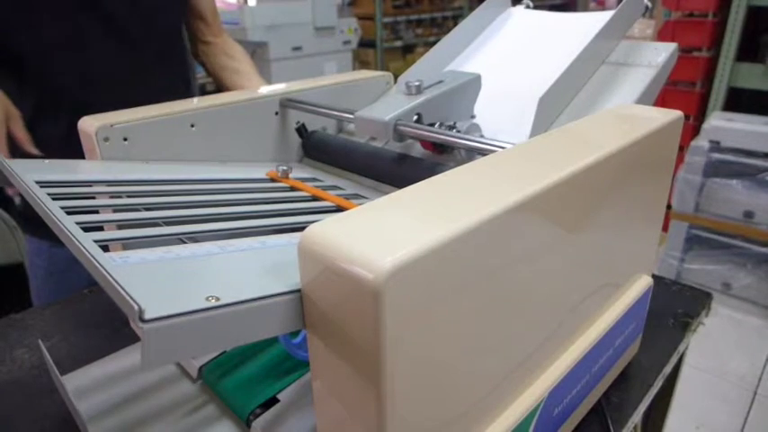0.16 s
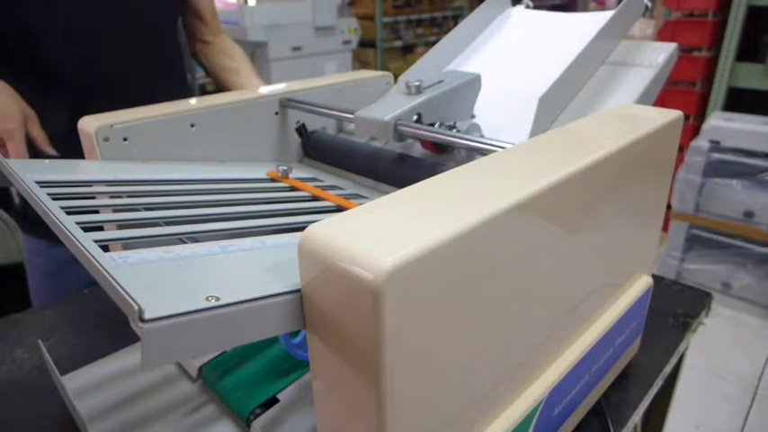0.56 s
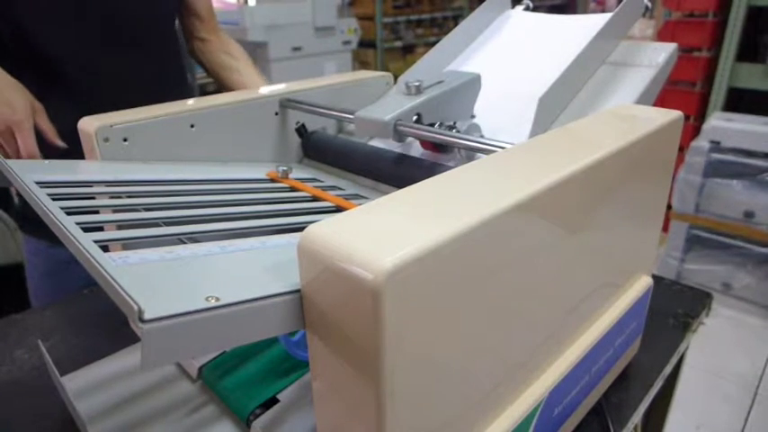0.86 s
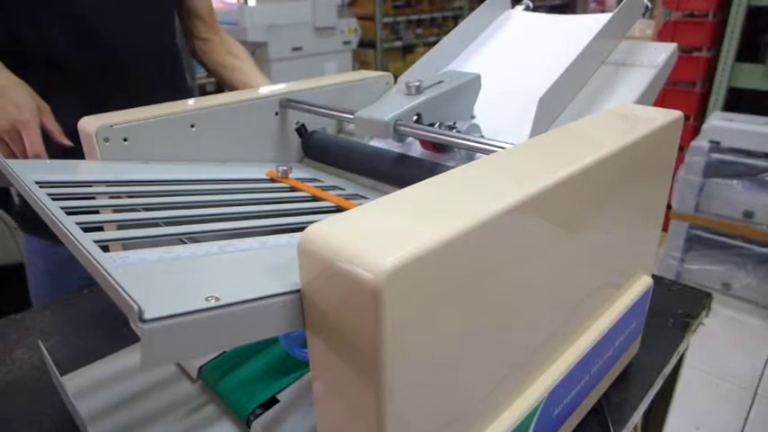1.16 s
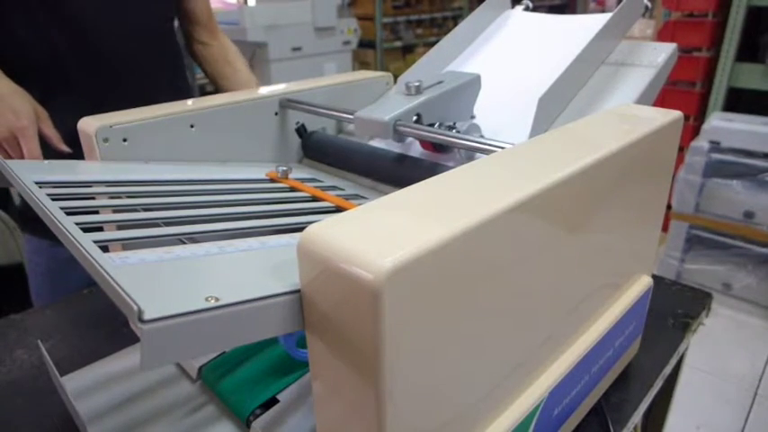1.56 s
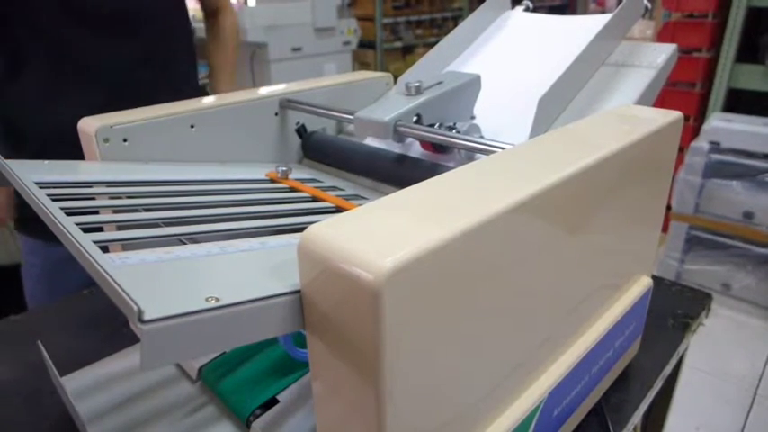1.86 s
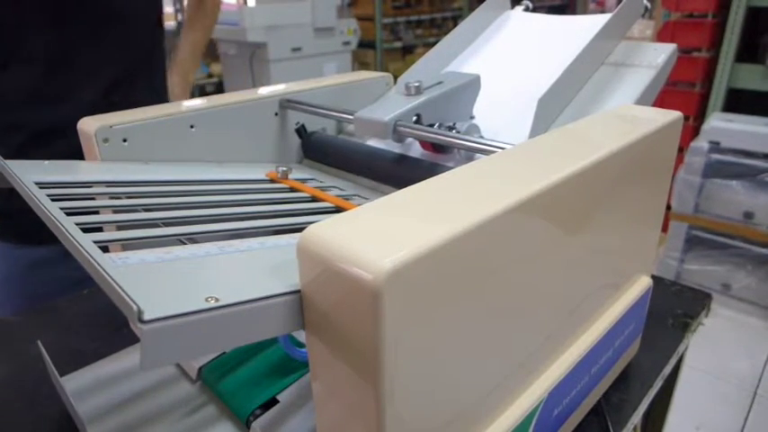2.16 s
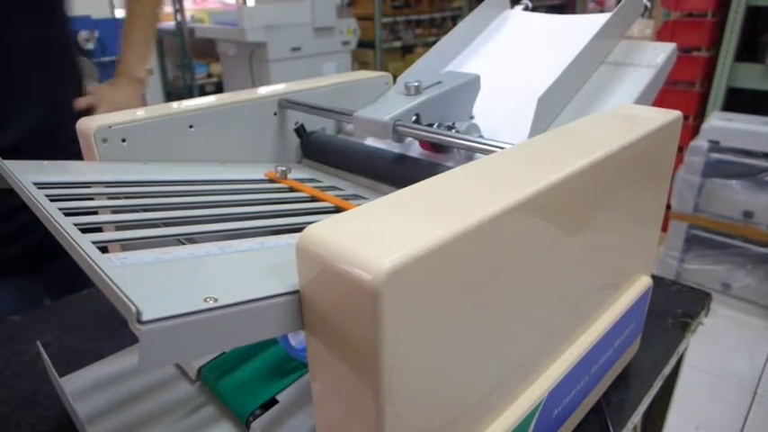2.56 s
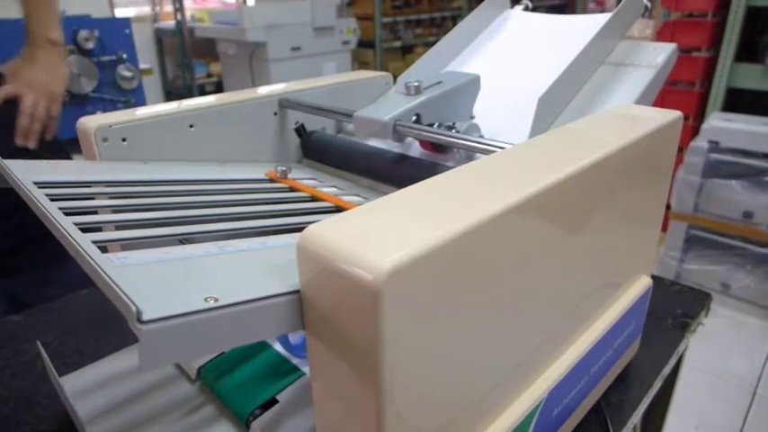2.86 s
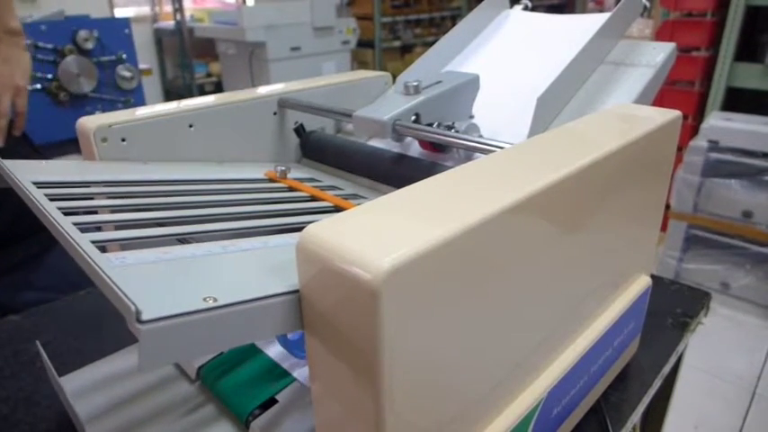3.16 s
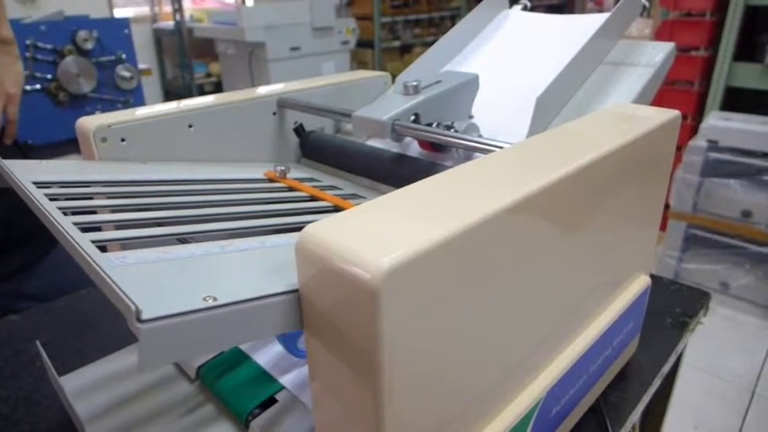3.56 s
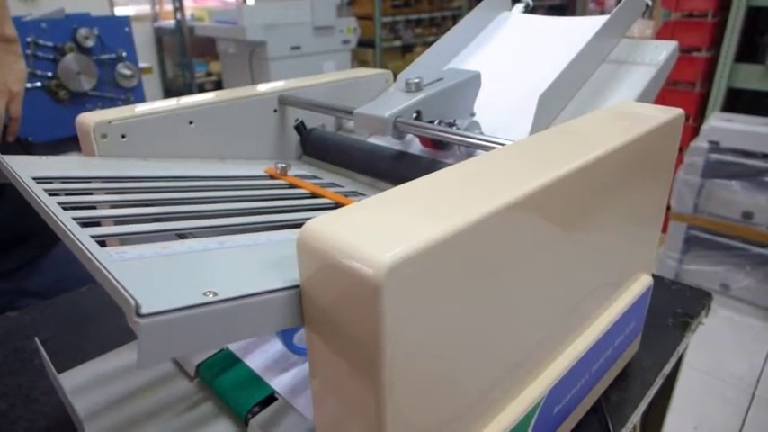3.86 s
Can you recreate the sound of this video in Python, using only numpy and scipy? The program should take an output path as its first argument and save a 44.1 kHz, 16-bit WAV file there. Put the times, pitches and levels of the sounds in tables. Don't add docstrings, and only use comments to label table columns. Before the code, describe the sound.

A paper folding machine heard close in a workshop. Until 0.6 s there is only a low distant fan murmur, a fading faint clang and a tiny tick. A switch snaps with a short metallic ring; a low motor hum spins up, with paper rustle and flaps. From 1.05 s, eight sheets pass about every 0.38 s: bright hard slap, weaker slap 0.12 s later, hiss and ticks, continuing to the cut-off at 4 s.

```python
import sys
import numpy as np
from scipy import signal
from scipy.fft import rfft, irfft
from scipy.io import wavfile
from scipy.ndimage import uniform_filter1d

SR = 44100
rng = np.random.default_rng(int(sys.argv[2]) if len(sys.argv) > 2 else 0)


def gain_from_db(level_db):
    decades = np.asarray(level_db, float) / 20
    return 10 ** decades


def store_wav(level_fs):
    pcm = np.round(np.clip(np.atleast_2d(level_fs), -1, 1) * 32767)
    wavfile.write(sys.argv[1], SR, pcm.T.astype(np.int16))


N = 176400

SWITCH_S = 0.607

# start in seconds, level in dB, pitch in Hz.
FIRST_STOP = [
    (1.052, -9.5, 2430),
    (1.4431, -7.5, 2830),
    (1.8191, -9.5, 2740),
    (2.1895, -10, 2400),
    (2.563, -8, 2510),
    (2.9414, -9, 2600),
    (3.317, -9.5, 2380),
    (3.697, -6.5, 2060),
]
# frequency in Hz, level in dB.
SECOND_BODY = [(120, -37), (200, 1), (1590, 1.5), (2090, -14.5), (3180, -3.5), (4750, -9), (7220, -18),
               (11400, -22), (15500, -45)]
# frequency in Hz, level in dB.
RUMBLE = [(300, -19), (500, -3), (800, -0.5), (1300, -7), (2200, -11), (4000, -48)]
# frequency in Hz, likeness from 0 to 1.
SAME = [(60, 0.27), (180, 0.99), (550, 0.98), (1650, 0.84), (4970, 0.81), (15000, 0.64)]


def evened(x):
    return x / np.sqrt(np.mean(x ** 2) + 1e-20)


def read(points, hz):
    f, value = np.transpose(points)
    return np.interp(np.log(hz + 1), np.log(f + 1), value)


def curve(points, t):
    return np.interp(t, *np.transpose(points))


def add(mix, s, sound):
    part = mix[:, round(s * SR):][:, :sound.shape[1]]
    part += sound[:, :part.shape[1]]


def resonate(x, hz, width):
    turn = np.exp(2j * np.pi * hz * np.arange(x.shape[-1]) / SR)
    r = np.exp(-np.pi * width / SR)
    return 2 * (turn * signal.lfilter([1 - r], [1, -r], x / turn)).real


def colour(x, body, same):
    hz = np.fft.rfftfreq(x.shape[1], 1 / SR)
    likeness = np.clip(read(same, hz), 0, 1)
    a, b = rfft(x, axis=1)
    mid = np.sqrt((1 + likeness) / 2) * a
    side = np.sqrt((1 - likeness) / 2) * b
    pair = np.array([mid + side, mid - side]) * gain_from_db(read(body, hz))
    return evened(irfft(pair, x.shape[1], axis=1))


def grainy(grain_db, grain_s):
    flicker = evened(uniform_filter1d(rng.standard_normal(N), max(round(grain_s * SR), 2)))
    return rng.standard_normal((2, N)) * gain_from_db(grain_db * flicker)


def knock(db, hz, body, t60, ring_db, width, rise):
    t = np.arange(4096) / SR
    noise = colour(rng.standard_normal((2, len(t))), body, SAME)
    noise = noise + gain_from_db(ring_db) * evened(resonate(noise, hz, width))
    burst = gain_from_db(-60 * (t / t60) ** 1.64) * np.minimum(t / rise, 1) * noise
    burst = signal.sosfilt(signal.butter(2, 350, "high", fs=SR, output="sos"), burst)
    return gain_from_db(db) * burst / abs(burst).max()


def since_stop(t):
    starts = np.array([0.643] + [row[0] for row in FIRST_STOP])
    return t - starts[np.maximum(np.searchsorted(starts, t) - 1, 0)]


def shop():
    # frequency in Hz, level in dB.
    shop_body = [(15, -51), (25, -40), (64, -39), (101, -14), (136, -7.5), (684, -4.5), (3260, -23.5),
                 (6920, -25), (15500, -41.5)]
    # frequency in Hz, likeness from 0 to 1.
    shop_same = [(60, 0.98), (380, 0.98), (2380, 0.71), (15000, 0.5)]
    # frequency in Hz, width in Hz, level in dB.
    shop_lines = [(4021, 60, -80), (4850, 80, -80), (6804, 10, -70)]
    t = np.arange(N) / SR
    floor = gain_from_db(-48) * colour(grainy(grain_db=2.56, grain_s=0.036), shop_body, shop_same)
    clang_hz, clang_db, clang_t60 = 1110, -50, 0.61
    clang = gain_from_db(clang_db - 60 * t / clang_t60) * np.sin(2 * np.pi * clang_hz * t)
    white = rng.standard_normal((2, N))
    whines = sum(gain_from_db(db) * evened(resonate(white, hz, w)) for hz, w, db in shop_lines)
    return floor + clang + whines


def motor():
    # time in seconds, level in dB.
    load = [(0.62, -48), (0.66, -39.5), (0.88, -33.5), (0.9, -45), (0.95, -27.5), (1.06, -40.5),
            (1.76, -31.5), (1.79, -39.5), (2.52, -34.5), (2.58, -48), (2.84, -31), (2.91, -46), (2.93, -37),
            (3.2, -40.5), (3.25, -30.5), (3.3, -46.5), (3.52, -39), (4.0, -38.5)]
    # seconds after the first stop, level in dB.
    grip = [(0, 4), (.02, -5), (.11, 1), (.14, 3.5), (.3, 0.5), (.34, 0), (.38, 7)]
    # frequency in Hz, width in Hz, level in dB.
    case_modes = [(192.4, 10.3, -11.5), (266.6, 23.4, 0.5), (330.3, 8.8, -5.5), (407, 11.8, -10),
                  (429, 14.4, -10)]
    # frequency in Hz, level in dB.
    whirr_body = [(15, -54), (25, -51), (55, -51), (175, -27), (260, -4.5), (482, -24), (848, -18),
                  (11200, -41.5), (15500, -55)]
    mesh_hz, teeth, spin_up_s, spin_from = 266, 10, .25, .88
    t = np.arange(N) / SR
    on = np.clip((t - SWITCH_S) / 0.037, 0, 1)
    speed = 1 - (1 - spin_from) * np.exp(-np.maximum(t - SWITCH_S, 0) / spin_up_s)
    wobble = evened(uniform_filter1d(uniform_filter1d(rng.standard_normal(N), 900), 900))
    turns = np.cumsum(mesh_hz * speed * (1 + 0.0284 * wobble)) / SR
    throb = 1 + .2 * np.cos(2 * np.pi * turns / teeth)
    rattle = rng.standard_normal(N)
    case = sum(gain_from_db(db) * evened(resonate(resonate(rattle, hz, w), hz, 3 * w)) for hz, w, db in case_modes)
    hum = evened(evened(case) + gain_from_db(-1) * np.sin(2 * np.pi * turns))
    hum_db = curve(load, t) + curve(grip, since_stop(t)) * (t > FIRST_STOP[0][0])
    whirr = gain_from_db(-41.5) * colour(grainy(grain_db=1.5, grain_s=.004), whirr_body, SAME)
    return on * (throb * hum * gain_from_db(hum_db) + whirr)


def crackle():
    snaps_per_s = 800
    size = gain_from_db(3.6 * np.minimum(rng.exponential(1, N), 4)) * (rng.random(N) < snaps_per_s / SR)
    fading = signal.lfilter([1], [1, -.96], size)
    return evened(fading * rng.standard_normal((2, N)))


def patchy(x, patch_db):
    z = signal.stft(x, nperseg=256)[2]
    field = rng.standard_normal(z.shape[1:])
    field = uniform_filter1d(uniform_filter1d(field, size=9, axis=0), size=7, axis=1)
    return evened(signal.istft(z * gain_from_db(patch_db * evened(field)), nperseg=256)[1][:, :N])


def paper():
    # seconds after the first stop, level in dB.
    slide = [(0, 3), (.05, -8), (.11, -17), (.118, 6.5), (.16, 2.5), (.2, -1), (.23, 3.5), (.3, 3),
             (.38, -20.5)]
    # seconds after the first stop, level in dB.
    scrape_db = [(0, 8.5), (.11, 4.5), (.125, 8), (.2, 5), (.23, 7), (.27, 2.5), (.31, 9.5), (.38, 4.5)]
    # time in seconds, level in dB.
    feed_in = [(.62, -9), (.8, -27), (.83, -11), (.93, -20), (.95, -1.5), (1.04, -4.5)]
    # frequency in Hz, level in dB.
    hiss_body = [(530, -25), (900, -6), (1580, -3.5), (2220, -1.5), (4080, 0), (4440, -3.5), (4770, 0.5),
                 (10800, -8), (15500, -21)]
    # frequency in Hz, width in Hz, level in dB.
    plates = [(2580, 120, -24.5), (4100, 74, -16.5), (5200, 550, -20), (7840, 310, -23.5)]
    t = np.arange(N) / SR
    since = since_stop(t)
    feed_db = curve(feed_in, t) - 60 * (t < SWITCH_S)
    rumble = colour(grainy(grain_db=2.0, grain_s=.006), RUMBLE, SAME)
    rumble = rumble * gain_from_db(-43.5 + curve(slide, since) + 0.31 * feed_db)
    fibres = grainy(grain_db=0.5, grain_s=.006) + gain_from_db(-7) * crackle()
    scrape = patchy(colour(fibres, hiss_body, SAME), patch_db=2.5)
    ringing = sum(gain_from_db(db) * evened(resonate(scrape, hz, w)) for hz, w, db in plates)
    hiss = (scrape + ringing) * gain_from_db(-43 + curve(scrape_db, since) + feed_db)
    return rumble + hiss


def switch():
    # frequency in Hz, level in dB.
    switch_body = [(120, -34), (200, 5), (497, -37), (1010, -5), (3360, -8.5), (4100, 0.5), (4840, -13),
                   (9310, -16), (15500, -29)]
    # frequency in Hz, level in dB, 60 dB decay in seconds.
    switch_ring = [(1100, 2, 0.14), (2306, -1, 0.083), (4040, -4, 0.16), (4300, -14, .07)]
    out = np.zeros((2, N))
    t = np.arange(8192) / SR
    add(out, SWITCH_S, knock(-18.5, 2200, switch_body, t60=.06, ring_db=-8, width=200, rise=0.00069))
    ring = sum(gain_from_db(db - 60 * t / t60) * np.sin(2 * np.pi * hz * t) for hz, db, t60 in switch_ring)
    add(out, SWITCH_S + .002, gain_from_db(-29.5) * np.array([ring, ring]) / abs(ring).max())
    return out


def air_puffs():
    # start in seconds, level in dB.
    puffs = [
        (.95, -52),
        (1.045, -57),
        (1.44, -57),
        (1.74, -55),
        (1.82, -59),
        (2.11, -53.5),
        (2.18, -54),
        (2.56, -53),
        (3.69, -56),
        (3.975, -47),
    ]
    out = np.zeros((2, N))
    puff_hz = 45
    t = np.arange(round(1.5 * SR / puff_hz)) / SR * puff_hz / 1.28
    for s, db in puffs:
        push = np.sin(3 * np.pi * t) * np.sin(np.pi * t) ** 2
        add(out, s, gain_from_db(db) * push * np.array([[1], [rng.uniform(0.17, 1)]]))
    return out


def tray_knocks():
    # start in seconds, level in dB.
    knocks = [
        (.945, -22),
        (1.345, -22.5),
        (3.977, -29.5),
    ]
    out = np.zeros((2, N))
    for s, db in knocks:
        add(out, s, knock(db, 780, SECOND_BODY, t60=.03, ring_db=-3, width=700, rise=0.0006))
    return out


def flaps():
    # start in seconds, level in dB, pitch in Hz.
    flap_rows = [
        (0.829, -27.5, 859),
        (0.867, -34, 719),
        (1.29, -27, 775),
        (2.789, -28.5, 740),
        (2.843, -38, 1050),
        (3.239, -37, 786),
        (3.601, -29.5, 1380),
    ]
    out = np.zeros((2, N))
    for s, db, hz in flap_rows:
        add(out, s, knock(db - 2.0, hz, RUMBLE, t60=0.074, ring_db=-5, width=86, rise=0.0025))
    return out


def edge_ticks():
    # start in seconds, level in dB.
    nip_ticks = [(1.14, -25.5), (1.484, -37), (1.524, -21), (1.8632, -32), (1.9005, -21.5), (2.2313, -28.5),
                 (2.269, -22), (2.6035, -31), (2.646, -25.5), (2.982, -30.5), (3.0226, -24.5),
                 (3.357, -32.5), (3.397, -24), (3.7357, -33), (3.776, -25.5)]
    # start in seconds, level in dB, pitch in Hz.
    crease_ticks = [(1.2703, -28, 2800), (1.2885, -28, 4090), (1.6707, -21, 2010), (2.0264, -24, 4700),
                    (2.045, -24, 2490), (2.4174, -25.5, 3590), (2.7706, -28, 4900), (2.7887, -20.5, 5560),
                    (3.1652, -29, 2150), (3.5399, -47, 2080), (3.902, -24.5, 4050), (3.9212, -29, 2050)]
    # start in seconds, level in dB, pitch in Hz.
    feed_ticks = [(0.168, -39, 5800), (0.816, -34, 5100), (0.943, -33, 2680), (0.9543, -20, 2600),
                  (0.9737, -21, 5040), (1.356, -35, 5100), (1.3706, -22, 4970), (1.733, -24.5, 5300),
                  (1.7489, -21.5, 7460), (2.096, -26, 3470), (2.1182, -21, 4870), (2.4794, -25.5, 4300),
                  (2.494, -20, 5450), (2.857, -26.5, 7950), (2.871, -21, 5200), (3.2312, -23, 7800),
                  (3.247, -22.5, 7840), (3.6112, -32.5, 5340), (3.626, -24, 3570), (3.9894, -31, 4770)]
    # start in seconds, level in dB, pitch in Hz.
    flap_ticks = [
        (0.9829, -34, 4070),
        (1.218, -25.5, 4100),
        (1.3441, -16.5, 2470),
        (1.6515, -28, 4520),
        (2.3974, -30, 3150),
        (3.1461, -30, 3960),
        (3.4734, -28, 4010),
        (3.8514, -36, 4070),
        (3.9737, -30, 2710),
    ]
    # frequency in Hz, level in dB.
    tick_body = [(300, -2), (1500, -2.5), (4000, -4), (9000, -1), (13000, -7), (15500, -37)]
    out = np.zeros((2, N))
    nips = [(s, db, 5200) for s, db in nip_ticks]
    for ticks in (nips, crease_ticks, feed_ticks, flap_ticks):
        for s, db, hz in ticks:
            add(out, s, knock(db + 0.35, hz, tick_body, t60=.016, ring_db=-2.5, width=550, rise=0.0015))
    return out


def strike(db, modes):
    contact_s, bounce_s, bounce_db = .0004, .0031, -2.5
    t = np.arange(2048) / SR
    contact = np.exp(-t / contact_s) * (rng.standard_normal((2, len(t))) * [[1], [.3]])
    contact[0, 0] += 5
    delay = round(bounce_s * rng.uniform(0.866, 1.0) * SR)
    bounce = np.roll(contact * rng.choice([-1, 1], (2, 1)), delay, axis=1)
    mid, side = contact + gain_from_db(bounce_db) * bounce
    drive = np.array([mid + side, mid - side])
    ring = np.zeros_like(drive)
    for k, (hz, w, level_db) in enumerate(modes):
        detune, lift = rng.standard_normal(2)
        mode = resonate(drive, hz * (1 + 0.014 * detune), w) / np.sqrt(w)
        ring += (-1) ** k * gain_from_db(level_db + 2.1 * lift) * mode
    ring = signal.sosfilt(signal.butter(2, 450, "high", fs=SR, output="sos"), ring)
    return gain_from_db(db) * ring / abs(ring).max()


def wall_return(slaps):
    wall_s, wall_db = .011, -7.5
    dull = signal.sosfilt(signal.butter(1, [1300, 7000], "band", fs=SR, output="sos"), slaps)
    return gain_from_db(wall_db) * np.roll(dull, round(wall_s * SR), axis=1)


def second_stop():
    # start in seconds, level in dB.
    second_slaps = [
        (1.173, -12.5),
        (1.558, -14.5),
        (1.934, -15),
        (2.3035, -24),
        (2.677, -21.5),
        (3.054, -13),
        (3.43, -15.5),
        (3.8089, -15.5),
    ]
    # frequency in Hz, width in Hz, level in dB.
    second_modes = [(600, 370, -6.5), (910, 270, -2.5), (1607, 150, -1.5), (2540, 270, -0.5),
                    (3100, 460, -5), (4130, 380, -5), (4720, 360, -6), (6200, 1700, -12)]
    slaps, rattle = np.zeros((2, 2, N))
    for s, db in second_slaps:
        add(slaps, s, strike(db - 0.5, second_modes))
        add(slaps, s, knock(db - 3, 1500, SECOND_BODY, t60=.022, ring_db=-16, width=600, rise=.0005))
        late = knock(db - 10, 2530, SECOND_BODY, t60=0.054, ring_db=4, width=440, rise=0.0045)
        add(rattle, s + .011, late)
    return slaps, rattle


def first_stop():
    # frequency in Hz, width in Hz, level in dB.
    first_modes = [(1360, 170, -9), (2120, 470, -3.5), (2700, 380, 0.5), (3410, 510, -4), (3910, 720, -1),
                   (4850, 440, -3), (6070, 910, -9), (9800, 4700, -10.5)]
    # frequency in Hz, level in dB.
    first_body = [(120, -53), (200, 7), (1090, 1), (1590, -4.5), (2750, 5.5), (4030, -3.5), (10800, -25),
                  (12500, -28), (15500, -43)]
    slaps = np.zeros((2, N))
    for s, db, hz in FIRST_STOP:
        add(slaps, s, strike(db, first_modes))
        add(slaps, s, knock(db - 3.5, hz, first_body, t60=.018, ring_db=-12, width=500, rise=0.0008))
    return slaps


def scene():
    second_slaps, rattle = second_stop()
    slaps = first_stop() + second_slaps
    sheets = slaps + wall_return(slaps) + rattle
    sheets = sheets + air_puffs() + tray_knocks() + flaps() + edge_ticks()
    left_db = 1.3
    close = (sheets + switch() + paper()) * gain_from_db([[left_db / 2], [-left_db / 2]])
    return close + motor() + shop()


def roll_off(x):
    return signal.sosfilt(signal.butter(12, 15900, fs=SR, output="sos"), x)


def record(dry):
    power_db = 10 * np.log10(abs(uniform_filter1d((dry ** 2).mean(0), 60, origin=29)) + 1e-12)
    fall = np.arange(N) * 306.0 / SR
    held_db = np.maximum.accumulate(power_db + fall) - fall
    over_db = np.maximum(held_db + 24.5, 0)
    ducked = dry / gain_from_db(0.62 * uniform_filter1d(over_db, 120, origin=59))
    ceiling = .27
    ducked = ceiling * np.tanh(ducked / ceiling)
    top = signal.firwin(127, 15300, window=("kaiser", 7), fs=SR)
    return roll_off(signal.oaconvolve(ducked, top[None], "same"))


dry = scene()
out = record(dry)
store_wav(out)
```